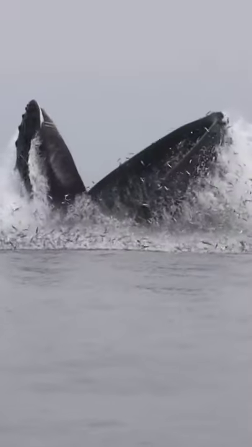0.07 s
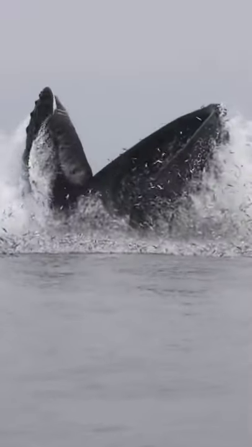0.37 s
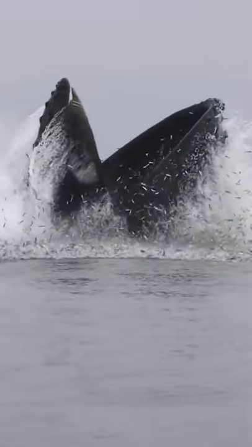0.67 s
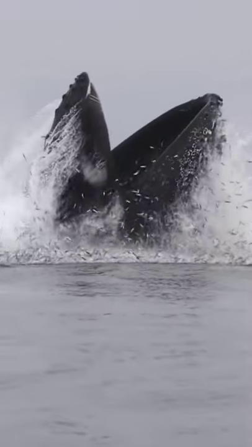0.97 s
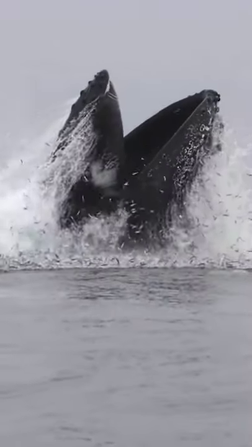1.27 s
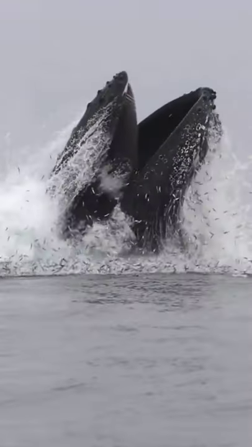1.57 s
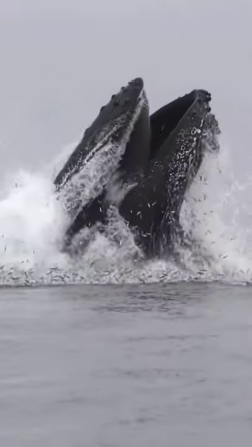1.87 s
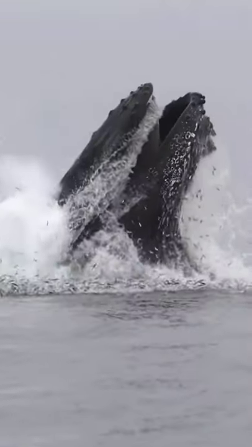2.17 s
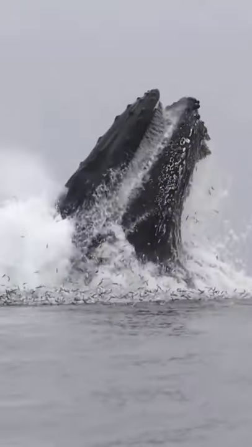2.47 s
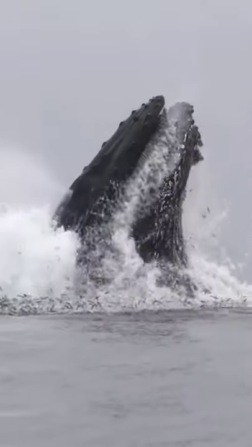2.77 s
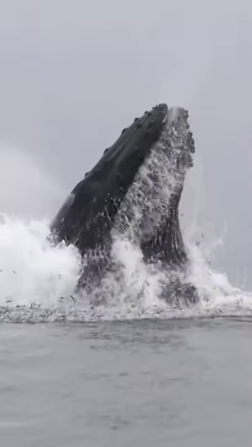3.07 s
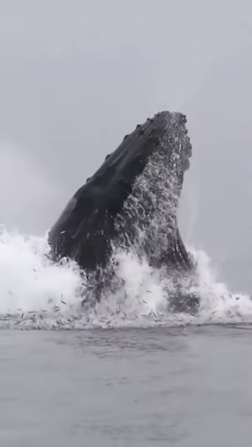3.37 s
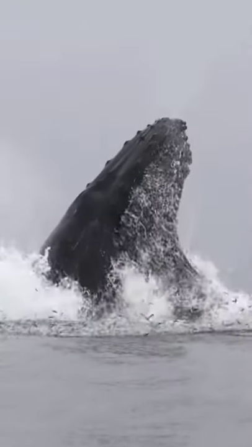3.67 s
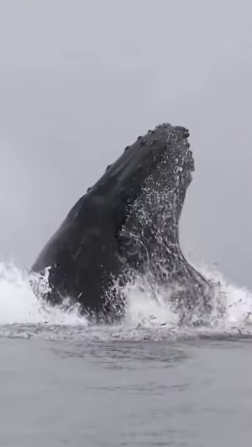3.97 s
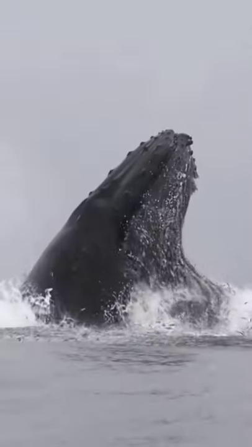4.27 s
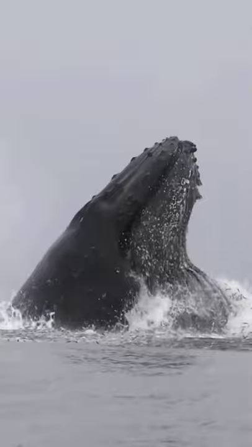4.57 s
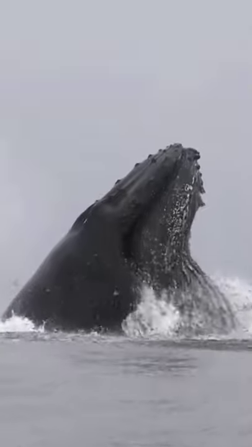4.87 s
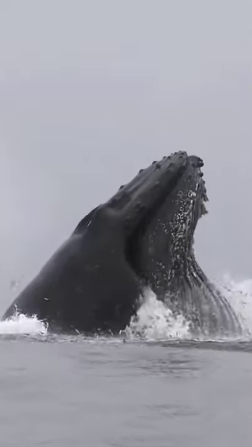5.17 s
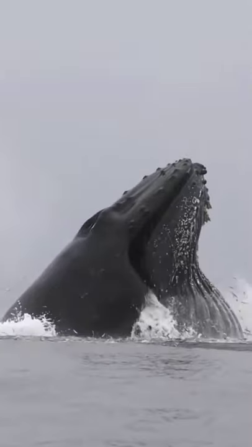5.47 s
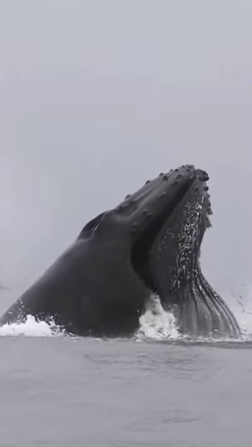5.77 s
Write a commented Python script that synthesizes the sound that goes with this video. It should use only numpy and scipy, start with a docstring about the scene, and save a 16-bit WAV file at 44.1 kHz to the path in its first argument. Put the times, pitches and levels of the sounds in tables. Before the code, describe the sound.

Dull, uneven, wind-like thumps and a deep rumble sit under a steady roar of splashing, gurgling seawater as a whale pushes up out of the sea. The splash and spray crest about halfway through, and trapped air caves in with hollow whumps. Then the whale sinks with a low boom, the water heaves, and the rush narrows and dies away, leaving quiet, bubbling foam.

```python
"""A whale lunges up through the sea surface with its mouth open and sinks back.
First come dull, wind-like thuds over a deep rumble, while white water churns with bubbles,
sheets of it splash down and fine spray hisses. The rush swells as the jaws close, and trapped
air pockets collapse. As the whale sinks, a low boom swells, the sea heaves and the splash fades.
Last, the top treble cuts out and a soft wash of foam is left."""
import sys
import numpy as np
from scipy import signal
from scipy.io import wavfile

SR = 44100
rng = np.random.default_rng(int(sys.argv[2]) if len(sys.argv) > 2 else 0)


def to_wav(sig):
    """Store sig (one row per channel, or 1-D mono) as 16-bit WAV at the path in sys.argv[1].

    Samples outside -1..1 are clipped; the rate is SR.
    """
    pcm = np.clip(np.atleast_2d(sig), -1, 1) * 32767
    pcm = np.round(pcm).astype(np.int16)
    wavfile.write(sys.argv[1], SR, pcm.T)  # frames by channels


N = 265041
TIME = np.arange(N) / SR


# The body of the white water. Each row: frequency in Hz, relative level in dB.
CHURN_COLOUR = [(80, -7), (150, 0), (250, -2.5), (420, -1), (620, -2), (930, -3.5), (1350, -11.5),
                (2200, -24.5)]

def churn(level_db):
    """White water: a roar of countless bubbles, with larger ones gurgling out of it."""
    roar = rush(CHURN_COLOUR, patchy_db=0.52, patch_rate=8.7, bands=13)
    bubbles = grains(CHURN_COLOUR, 306.5, 1583, per_s=700, cycles=13.6, size_db=2.5, pan_db=7, count=24)
    return from_db(level_db) * (from_db(-0.98) * roar + from_db(-6) * bubbles)


# The bright slap of falling water. Each row: frequency in Hz, relative level in dB.
SPLASH_COLOUR = [(700, -7.5), (1300, 0.5), (1900, 1.5), (3100, -1.5), (4100, -5), (5000, -7.5), (6200, -16),
                 (8500, -18.5)]

def splash(level_db):
    """Sheets of water fall back in uneven slaps, with drops plinking around them."""
    sheets = rush(SPLASH_COLOUR, patchy_db=1.0, patch_rate=9.5, bands=14)
    drops = grains(SPLASH_COLOUR, 1400, 6040, per_s=2000, cycles=58, size_db=0.5, pan_db=15, count=26)
    flutter_db = 0.19 * drift(25)
    return from_db(level_db + flutter_db) * (from_db(-0.08) * sheets + from_db(-8.0) * drops)


# The airy top of the spray. Each row: frequency in Hz, relative level in dB.
SPRAY_COLOUR = [(5000, -5.5), (7000, -3.5), (8200, -4.5), (9300, -2.5), (11000, -6), (13000, -9.5),
                (15500, -13)]

def spray(level_db, linger_db=-55.5, treble_cut_s=4.785, fade_s=0.016):
    """Spray hisses and fizzes; the top treble lingers faintly, then cuts out abruptly."""
    strength = np.hypot(from_db(level_db), from_db(linger_db))
    gate = np.clip((treble_cut_s - TIME) / fade_s + .5, 0, 1)
    hiss = rush(SPRAY_COLOUR, patchy_db=0.85, patch_rate=22, bands=10)
    fizz = grains(SPRAY_COLOUR, 6700, 12300, per_s=5700, cycles=11, size_db=3.0, pan_db=24, count=10)
    flicker = from_db(0.73 * drift(16))
    return gate * strength * flicker * (from_db(-.5) * hiss + from_db(-8.5) * fizz)


# Large air pockets collapsing. Each row: start in seconds, rms level at the peak in dB.
COLLAPSES = [(2.644, -30), (2.975, -29), (3.165, -35), (3.225, -29), (3.37, -46), (3.559, -36)]
# Their hollow tone. Each row: frequency in Hz, relative level in dB.
POCKET_COLOUR = [(65, 8), (95, 5), (130, -1), (175, -6), (300, -11.5), (420, -20)]

def air_pockets():
    """A trapped air pocket caves in with a rough, hollow whump."""
    strength = sum(from_db(peak_db) * puff(s, rise_s=.02) for s, peak_db in COLLAPSES)
    return strength * rush(POCKET_COLOUR, patchy_db=2.5, patch_rate=10.4, bands=5, spread=.5)


# Deep, dull thuds, like buffeting wind. Each row: moment in seconds, level in dB, pitch in Hz.
LOW_THUDS = [(.254, -11, 28), (.354, -6, 26), (.465, -7, 27), (.534, -9, 28), (.659, -2.5, 31),
             (.801, -11, 34), (.877, -6, 28), (1.083, -9.5, 20), (1.224, -3, 33), (1.464, -5.5, 31),
             (1.661, -3, 31), (1.938, -6, 28), (2.141, -10, 24), (2.241, -9.5, 23), (2.436, -4, 30),
             (2.956, -7.5, 29), (3.054, -8.5, 27), (3.162, -9.5, 24), (3.756, -13, 34), (3.816, -13, 30),
             (4.62, -24, 38)]

def thuds(swing_cycles=0.58, knock_hz=88, knock_db=-17, knock_s=0.014,
          shudder_hz=41, shudder_db=-18, shudder_s=0.027):
    """Each thud is one slow swing of pressure, then a shudder; hard ones also knock higher up."""
    out = np.zeros(N)
    for s, level_db, hz in LOW_THUDS:
        age = TIME - s
        lead = from_db(level_db) / 3   # a harder thud draws back further before it shoves
        envelope = np.exp((lead ** 2 - (hz * age + lead) ** 2) / swing_cycles ** 2)
        swing = np.cos(2 * np.pi * hz * age) * envelope
        shudder = from_db(shudder_db) * np.cos(2 * np.pi * shudder_hz * age) * puff(s, shudder_s)
        knock = from_db(level_db + knock_db) * np.cos(2 * np.pi * knock_hz * age) * bump(s, knock_s)
        out += from_db(level_db) * (swing + shudder + knock)
    return out


# The sub-bass bed. Each row: frequency in Hz, relative level in dB.
RUMBLE_COLOUR = [(6, -10), (12, 8), (20, 1), (30, -1), (43, -5.5), (51, -13), (62, -16)]

def rumble():
    """A deep, wind-like rumble runs on below the thuds."""
    strength = swell(hold_s=(.3, 3.2), level_db=-20, rise_db_per_s=1.8, fall_db_per_s=8.1)
    return strength * rush(RUMBLE_COLOUR, patchy_db=1.0, patch_rate=3.8, bands=9, spread=0)


# The boom just above the rumble. Each row: frequency in Hz, relative level in dB.
BOOM_COLOUR = [(45, 8.5), (64, 5), (85, -8), (115, -8.5), (160, -13), (250, -22.5)]

def boom(full_thud_db=-22, db_per_thud_db=2.6):
    """A low boom follows hard thuds and swells as the whale sinks."""
    after_thuds = sum(from_db(full_thud_db + db_per_thud_db * level_db) * puff(s, rise_s=0.038)
                      for s, level_db, _ in LOW_THUDS)
    sinking = swell(hold_s=(2.97, 3.25), level_db=-28.5, rise_db_per_s=24, fall_db_per_s=15.5)
    body = rush(BOOM_COLOUR, patchy_db=0.5, patch_rate=8.7, bands=6, spread=0)
    return np.hypot(sinking, after_thuds) * body


# The dark weight of the sea. Each row: frequency in Hz, relative level in dB.
HEAVE_COLOUR = [(20, -9), (40, 6), (70, -1.5), (110, -6.5), (200, -19.5), (500, -19.5), (1100, -23.5),
                (2200, -71)]

def heave():
    """The sea heaves, deep and wide, with separate noise at each ear."""
    ears = [rush(HEAVE_COLOUR, patchy_db=1.5, patch_rate=1.7, bands=8, spread=0)[0] for _ in range(2)]
    strength = swell(hold_s=(3.05, 4.55), level_db=-38, rise_db_per_s=8.8, fall_db_per_s=10)
    return strength * np.array(ears)


# The soft tail of foam. Each row: frequency in Hz, relative level in dB.
WASH_COLOUR = [(110, -21), (220, -5), (370, 0.5), (750, 0), (1200, -1.5), (1900, -6.5), (2900, -8),
               (4200, -12.5), (5400, -10.5), (7200, -24), (8100, -32), (10200, -24.5), (11500, -31),
               (12500, -46)]

def wash():
    """A compact sheet of foam spreads over the surface, with small bubbles bursting in it."""
    foam = rush(WASH_COLOUR, patchy_db=0.8, patch_rate=18, bands=26, spread=0.041)
    bubbles = grains(WASH_COLOUR, 410, 2130, per_s=800, cycles=63, size_db=5.5, pan_db=14, count=14)
    strength = swell(hold_s=(4.2, 5.3), level_db=-41.5, rise_db_per_s=1.2, fall_db_per_s=10.9)
    return strength * (from_db(-0.98) * foam + from_db(-11) * bubbles)


def wave_echoes(x, count=40, total_db=-18, longest_s=.05):
    """Many weak reflections off the choppy water ripple the spectrum."""
    out = x.copy()
    gain = from_db(total_db) / np.sqrt(count)
    for late, sign in rng.random((count, 2)):
        lag = 1 + int(late * longest_s * SR)
        out[:, lag:] += np.sign(sign - .5) * gain * x[:, :-lag]
    return out


# How alike the two ears are. Each row: frequency in Hz, likeness from 0 to 1.
EAR_LIKENESS = [(60, .9), (150, .72), (700, .74), (2400, .76), (4500, .48), (7000, .42), (9600, .72),
                (13000, .56)]
# The water leans to the right. Each row: frequency in Hz, left minus right in dB.
EAR_BALANCE = [(60, -6), (180, -3.5), (800, -4), (2300, -0.4), (4400, -1.7), (8000, 0)]
# The splash draws in to one spot. Each row: time in seconds, stereo width as a factor.
STEREO_WIDTH = [(0, 0.9), (2.6, 1.1), (4.7, 0.27)]

def rush(colour, patchy_db, patch_rate, bands, spread=1):
    """Stereo noise in bands that each swell and sink alone; the middle has rms 1."""
    edges = np.geomspace(colour[0][0], colour[-1][0] * 2 ** (1 / 10), bands + 1)
    white = rng.standard_normal((2, 2, N + SR // 2))   # neighbouring bands get unrelated noise
    width = spread * np.interp(TIME, *np.transpose(STEREO_WIDTH))
    out = 0
    for k, (low, high) in enumerate(zip(edges, edges[1:])):
        bandpass = signal.butter(2, [low, high], "band", fs=SR, output="sos")
        mid, side = signal.sosfilt(bandpass, white[k % 2])[:, -N:]
        hz = np.sqrt(low * high)
        alike = at_hz(EAR_LIKENESS, hz)
        side = side * width * np.sqrt((1 - alike) / (1 + alike))
        gain = from_db(at_hz(colour, hz) + patchy_db * drift(patch_rate))
        out = out + panned(gain * np.array([mid + side, mid - side]), spread * at_hz(EAR_BALANCE, hz))
    return out / np.std(out.mean(axis=0))


def grains(colour, low_hz, high_hz, per_s, cycles, size_db, pan_db, count):
    """Bubbles or drops of random size and place, each ringing briefly at one of count pitches; rms 1."""
    out = np.zeros((2, N))
    per_pitch = int(per_s * N / SR / count)
    for hz in np.geomspace(low_hz, high_hz, count):
        when, size, sign, place = rng.random((4000, 4))[:per_pitch].T
        size_steps = np.minimum(-np.log(1 - size), 4)   # many small, a few large
        height = np.sign(sign - .5) * from_db(size_db * size_steps)
        ear_gains = from_db(np.outer([1, -1], pan_db * (place - .5)))
        clicks = np.zeros((2, N))
        clicks[:, (when * N).astype(int)] = height * ear_gains
        plinks = panned(ring(clicks, hz, t60=cycles / hz), at_hz(EAR_BALANCE, hz))
        out += plinks * hz * from_db(at_hz(colour, hz))
    return rms_one(out)


def ring(clicks, hz, t60):
    """A unit click sets a sine of height 1 ringing."""
    r, w = np.exp(-np.log(1000) / (t60 * SR)), 2 * np.pi * hz / SR
    return signal.lfilter([0, np.sin(w)], [1, -2 * r * np.cos(w), r * r], clicks + 1e-18)


def lunge(level_db, build_db_per_s, crest_db, fall_db_per_s, jaws_close_s=2.54, sink_s=3.18):
    """A layer's level in dB: slow build, crest as the jaws close, steady fall as the whale sinks."""
    build = build_db_per_s * np.minimum(TIME - sink_s, 0)
    crest = crest_db * bump(jaws_close_s, half_width_s=.38)
    fall = fall_db_per_s * np.maximum(TIME - sink_s, 0)
    return level_db + build + crest - fall


def swell(hold_s, level_db, rise_db_per_s, fall_db_per_s):
    """A gain that rises, holds and dies away."""
    early_s, late_s = np.maximum(hold_s[0] - TIME, 0), np.maximum(TIME - hold_s[1], 0)
    return from_db(level_db - rise_db_per_s * early_s - fall_db_per_s * late_s)


def bump(s, half_width_s):
    """A smooth rise and fall of height 1 around a moment."""
    return np.exp(-((TIME - s) / half_width_s) ** 2)


def puff(s, rise_s):
    """A quick attack to 1 from a moment on, and a slower decay."""
    age = np.maximum(TIME - s, 0) / rise_s
    return age * np.exp(1 - age)


def drift(rate, hop=40, settle=2000):
    """A smooth random wobble of rms 1 that changes about rate times a second."""
    r = np.exp(-2 * np.pi * rate * hop / SR)
    noise = rng.standard_normal(N // hop + settle + 2)
    slow = signal.lfilter([1], [1, -2 * r, r * r], noise)[settle:]
    return np.interp(np.arange(N) / hop, np.arange(len(slow)), rms_one(slow))


def panned(x, lean_db):
    """Share a sound between left and right."""
    return x * np.sqrt(from_db([[lean_db], [-lean_db]]))


def at_hz(curve, hz):
    """Read a curve on a log-frequency axis."""
    frequencies, values = np.transpose(curve)
    return np.interp(np.log(hz), np.log(frequencies), values)


def from_db(db):
    """Decibels to gain."""
    return 10 ** (np.asarray(db) / 20)


def rms_one(x):
    """Scale to rms 1."""
    return x / np.sqrt(np.mean(x ** 2) + 1e-20)


# Accents from single sheets of water flung out. Each row: moment in seconds, lift of the churn in dB.
SLOSHES = [(.26, 2.2), (.93, 1.4), (1.45, 1.3), (2.46, 1.8), (2.72, 1.0), (3.24, 1.8)]

def scene():
    """The low end under echoing white water, which rides the lunge and jumps with each slosh."""
    slosh_db = sum(lift_db * bump(s, half_width_s=0.036) for s, lift_db in SLOSHES)
    dip_db = 2.8 * bump(0.627, half_width_s=.075)   # splash and spray dip briefly
    treble_db = 0.68 * slosh_db - dip_db
    churn_db = slosh_db + lunge(-31.5, build_db_per_s=.5, crest_db=2.5, fall_db_per_s=16.5)
    splash_db = treble_db + lunge(-36.5, build_db_per_s=.15, crest_db=2, fall_db_per_s=11.5)
    spray_db = treble_db + lunge(-43, build_db_per_s=.1, crest_db=3.5, fall_db_per_s=16)
    white_water = churn(churn_db) + splash(splash_db) + wash() + spray(spray_db)
    return thuds() + rumble() + boom() + heave() + air_pockets() + wave_echoes(white_water)


def record(dry):
    """Peaks clip at full scale and a steep low-pass takes off the very top."""
    lowpass = signal.ellip(12, .1, 90, 15750, fs=SR, output="sos")
    return signal.sosfilt(lowpass, np.clip(dry, -1, 1))


dry = scene()
out = record(dry)
to_wav(out)
```